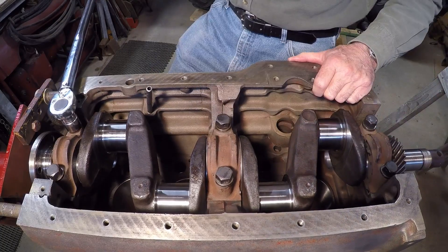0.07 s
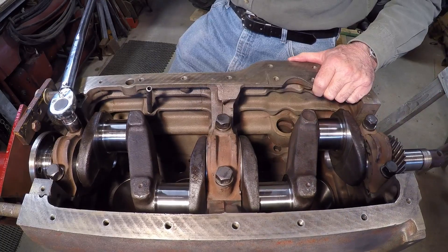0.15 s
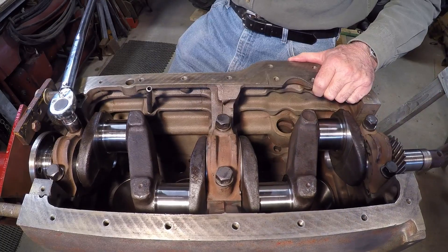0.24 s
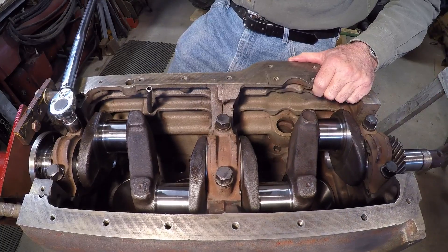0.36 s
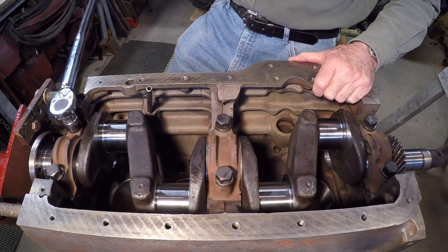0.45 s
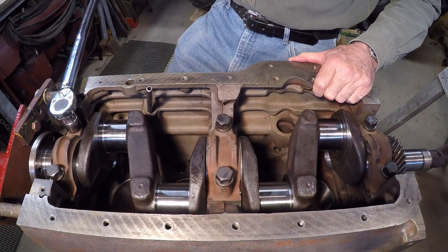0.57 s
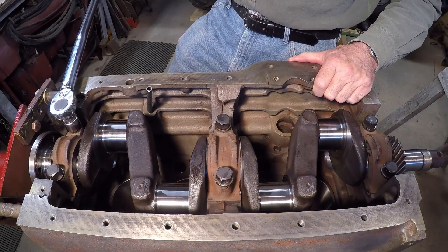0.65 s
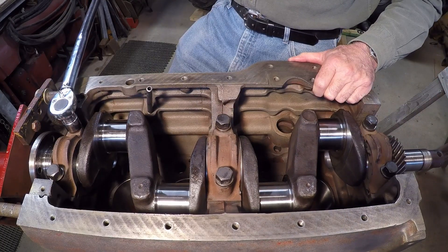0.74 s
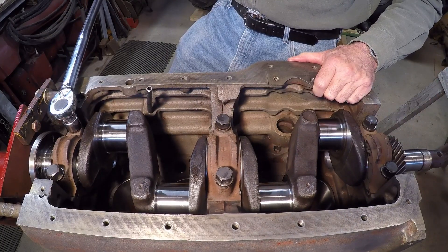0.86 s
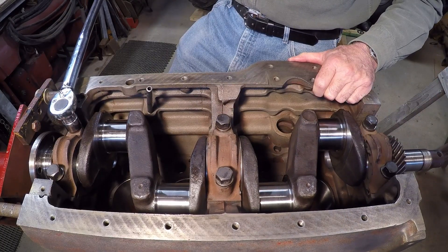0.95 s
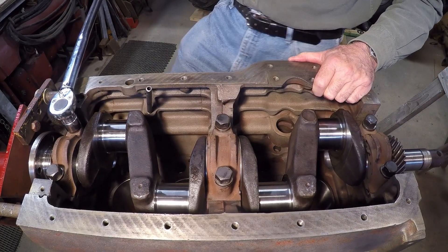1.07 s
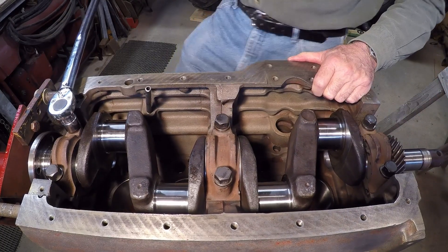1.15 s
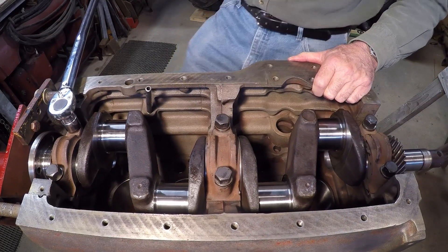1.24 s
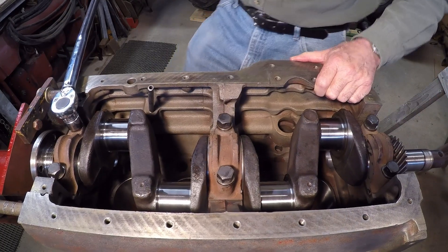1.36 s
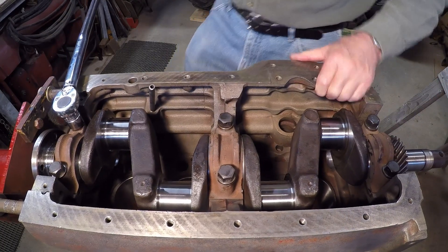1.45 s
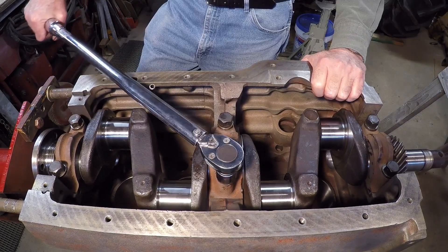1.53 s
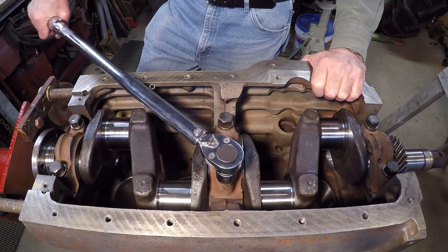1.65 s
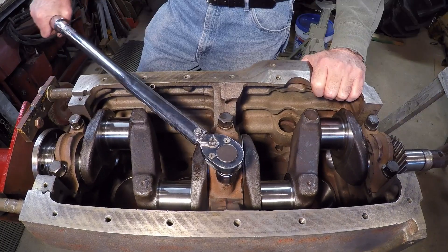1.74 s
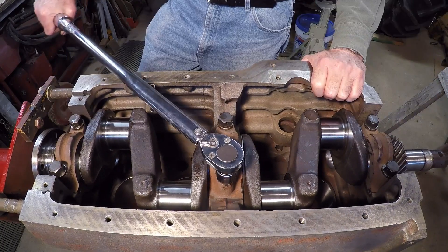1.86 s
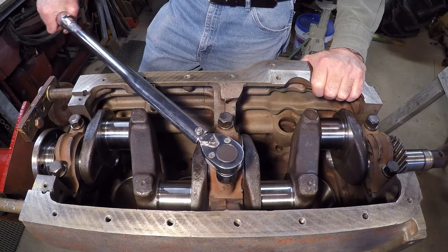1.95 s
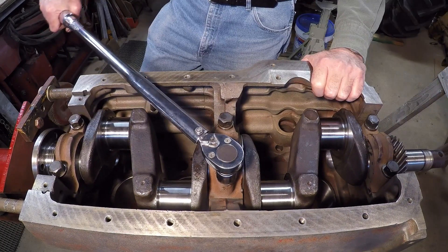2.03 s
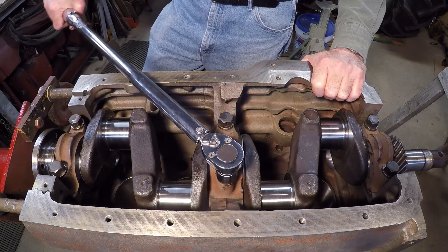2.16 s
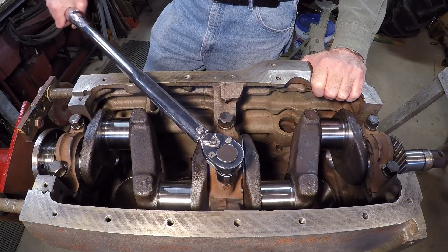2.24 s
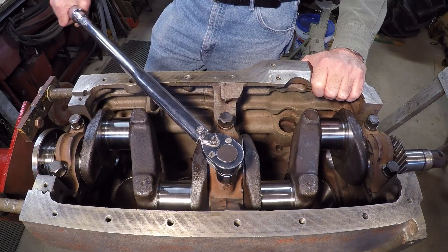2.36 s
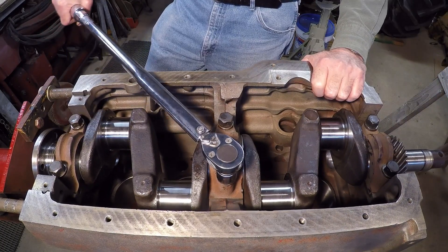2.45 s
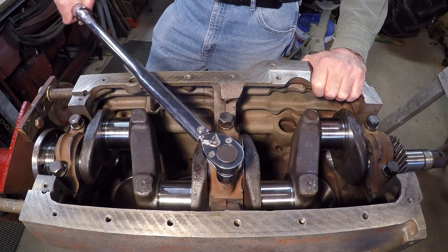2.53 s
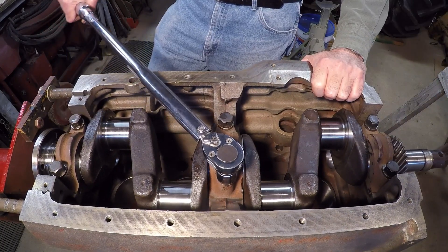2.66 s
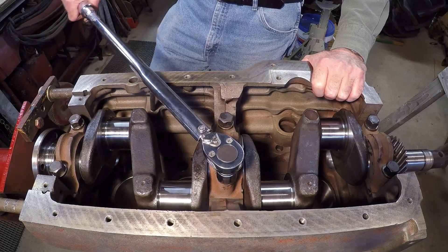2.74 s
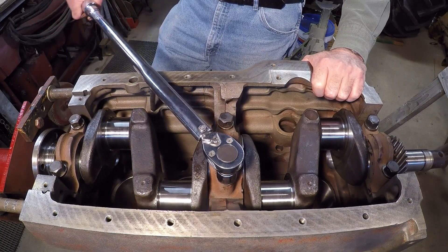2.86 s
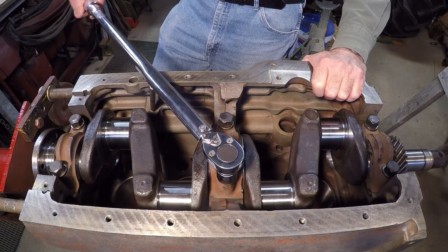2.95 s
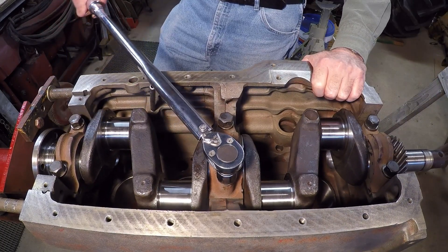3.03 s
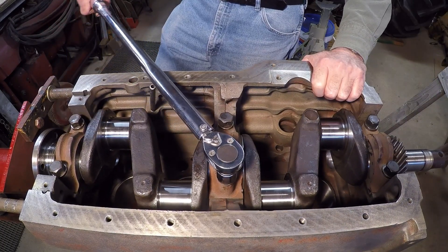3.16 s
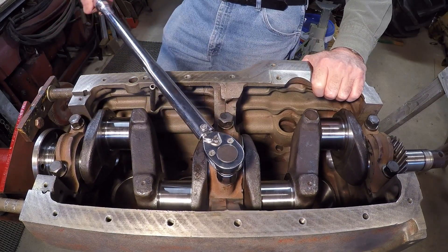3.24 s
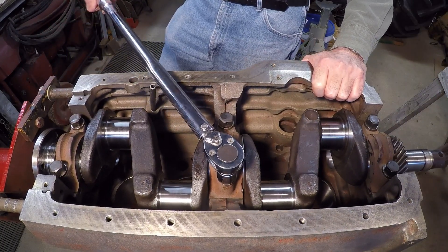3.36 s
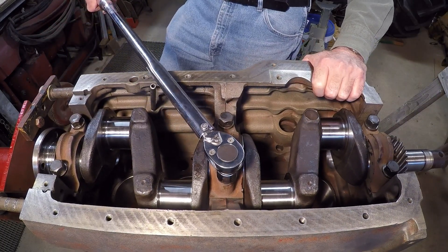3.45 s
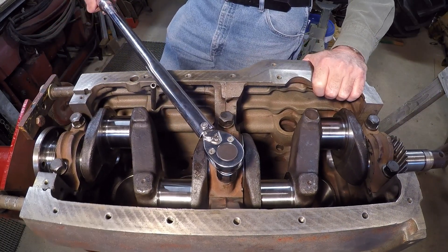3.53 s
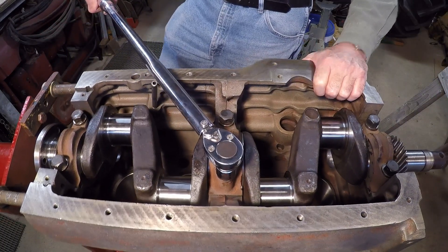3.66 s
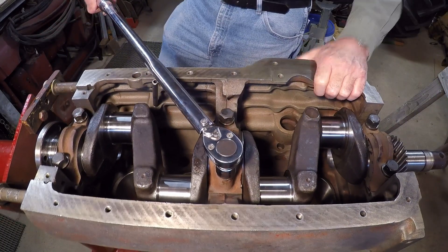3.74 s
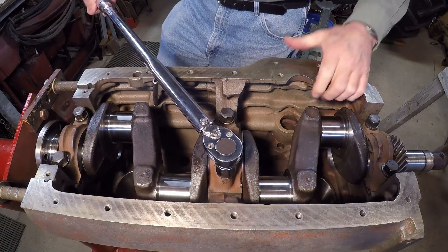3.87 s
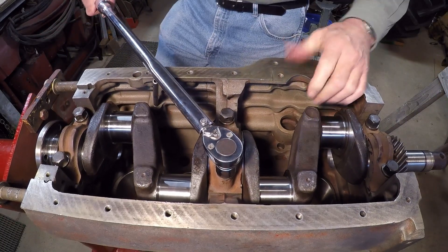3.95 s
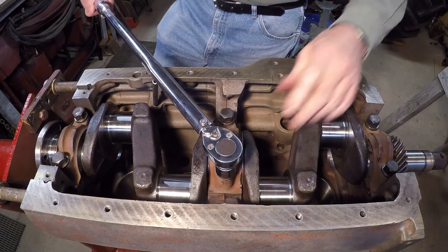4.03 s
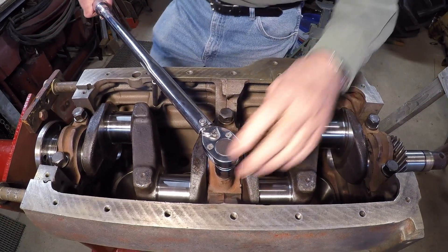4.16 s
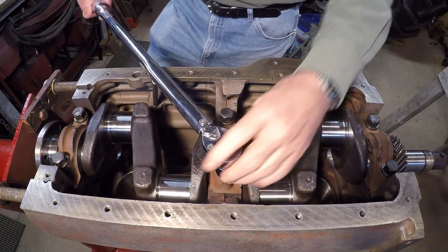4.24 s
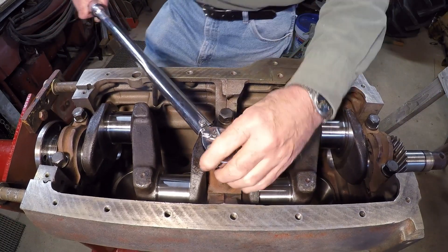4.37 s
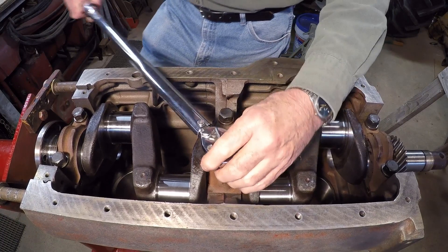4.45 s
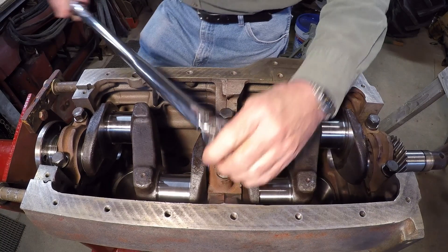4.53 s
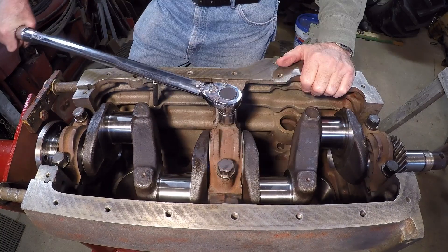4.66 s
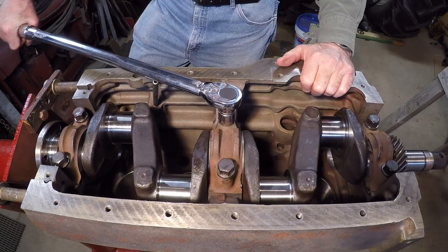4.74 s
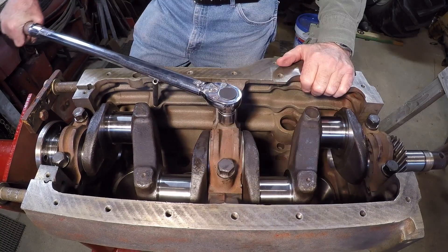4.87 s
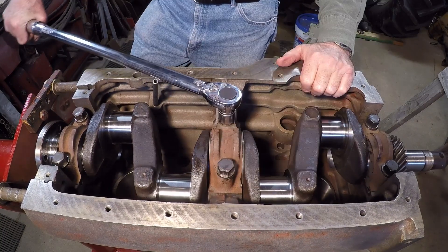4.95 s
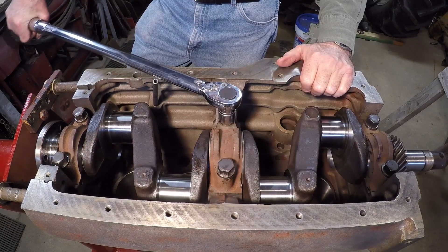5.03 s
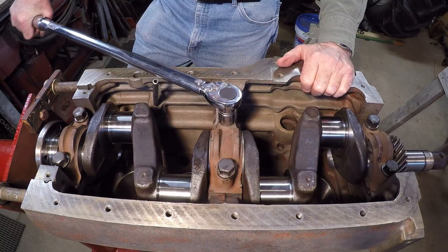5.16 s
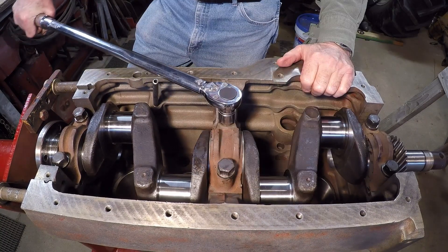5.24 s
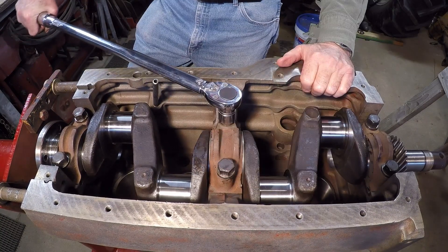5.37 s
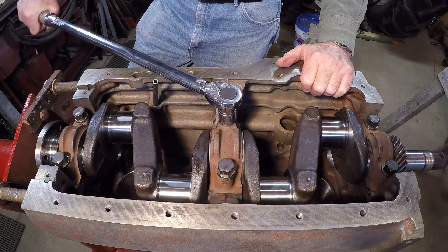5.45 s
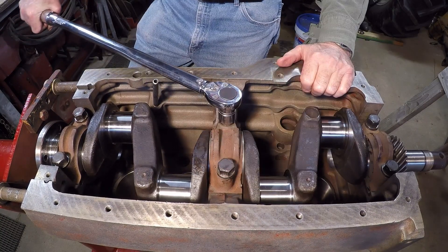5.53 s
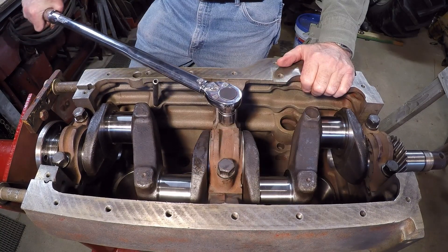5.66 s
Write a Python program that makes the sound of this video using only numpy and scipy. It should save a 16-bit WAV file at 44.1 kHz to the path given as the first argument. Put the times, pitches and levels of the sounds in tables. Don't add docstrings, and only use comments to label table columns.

```python
import sys
import numpy as np
from scipy import signal
from scipy.fft import rfft, irfft
from scipy.io import wavfile
from scipy.ndimage import uniform_filter1d

SR = 44100
rng = np.random.default_rng(int(sys.argv[2]) if len(sys.argv) > 2 else 0)


def attenuation_scalar(level_db):
    decades = np.asarray(level_db, float) / 20
    return 10 ** decades


def log_audio(samples):
    frames = np.atleast_2d(samples).T
    limited = np.clip(frames, -1, 1)
    pcm = np.round(limited * 32767).astype(np.int16)
    wavfile.write(sys.argv[1], SR, pcm)


N = 251370
T = np.arange(N) / SR

CUTS_S = [
    1.526,
    4.655,
]


def on_log(hz, table):
    table_hz, value = np.transpose(table)
    return np.interp(np.log(np.maximum(hz, 1)), np.log(table_hz), value)


def coloured(size, colour):
    hz = np.arange(size // 2 + 1) * SR / size
    spec = rfft(rng.standard_normal(size)) * attenuation_scalar(on_log(hz, colour))
    return spec / np.std(irfft(spec, size)), hz


def noise(colour):
    return irfft(coloured(N, colour)[0], N)


def add(out, sound, start_s):
    i = int(start_s * SR)
    out[i:i + len(sound)] += sound[:N - i]


def decay(t, t60):
    return np.exp(-np.log(1000) * t / t60)


def ring(t, modes):
    hz, db, t60 = np.transpose(modes)[:, :, None]
    return np.sum(attenuation_scalar(db) * np.sin(2 * np.pi * hz * t) * decay(t, t60), axis=0)


def paired(modes):
    return modes + [(hz * 1.0045, db - 5.5, t60) for hz, db, t60 in modes]


def walk(rate):
    hold = int(SR / rate)
    steps = np.repeat(rng.standard_normal(N // hold + 1), hold)
    return 1.2 * uniform_filter1d(steps, hold)[:N]


def burst(t, colour, t60):
    size = len(t)
    hz = np.arange(size // 2 + 1) * SR / size
    ceps = irfft(np.log(attenuation_scalar(on_log(hz, colour))), size)
    ceps[1:size // 2] *= 2
    ceps[size // 2 + 1:] = 0
    shape = np.exp(rfft(ceps))
    push = rng.standard_normal(size) * decay(t, t60)
    return irfft(rfft(push) * shape, size) / np.sqrt(np.mean(np.abs(shape) ** 2))


def strokes(rows):
    total = 0
    for peak_s, db, rise, fall in rows:
        below_peak = np.where(T < peak_s, rise * (peak_s - T), fall * (T - peak_s))
        total = total + attenuation_scalar(db - below_peak)
    return total


def shop():
    # Hz, dB per Hz.
    shop_colour = [(8.8, -32), (15, -6), (33, -0.5), (61, -5.5), (112, -11.5), (137, -18.5), (163, -19.5),
                   (380, -26.5), (494, -26.5), (721, -30), (4260, -37), (14500, -46), (15800, -56)]
    # centre in seconds, lift in dB, half length in seconds.
    stir = [
        (0.01, 3, 0.14),
        (4.102, 5, 0.33),
        (5.652, 0, 0.21),
    ]
    spec, hz = coloured(N, shop_colour)
    middle = np.exp(-np.log2(np.maximum(hz, 1) / 1200) ** 2 / 7.0)
    lift_db = sum(db * np.exp(-((T - s) / half_s) ** 2) for s, db, half_s in stir)
    swell = attenuation_scalar(lift_db + 0.4 * walk(5.6))
    swell = swell * attenuation_scalar(lift_db * 0.18 * walk(19))
    return attenuation_scalar(-53.5) * (irfft(spec * (1 - middle), N) + irfft(spec * middle, N) * swell)


def hands():
    # centre in seconds, level in dB, half length in seconds, centre in Hz.
    rustles = [(3.968, -82, .04, 900), (4.037, -69, .05, 640), (4.1, -71.5, .12, 1800),
               (4.25, -73, .1, 4000), (4.3, -75, .04, 1500), (4.212, -76, .05, 1700),
               (4.29, -72, 0.046, 500), (4.803, -68, 0.028, 1150), (4.85, -75, .02, 1100),
               (5.01, -69, .015, 1500), (.15, -63, 0.056, 300), (1.467, -63, 0.01, 800),
               (4.556, -57.5, 0.0053, 980), (4.513, -60, 0.0054, 900)]
    out = 0
    for s, db, half_s, hz in rustles:
        cloth = signal.lfilter(*signal.iirpeak(hz, 3.0, SR), rng.standard_normal(N))
        grain = attenuation_scalar(db + 2.8 * walk(70))
        out = out + cloth / np.std(cloth) * grain * np.exp(-((T - s) / half_s) ** 2)
    return out


def ticks():
    # start in seconds, level in dB, t60 in seconds, treble tilt in dB per kHz.
    contacts = [
        (1.4974, -35.5, 0.013, 0.4),
        (4.4160, -40, 0.018, -1.5),
        (4.4215, -36, 0.022, -1),
        (4.431, -32, 0.019, -4),
        (3.2372, -27, .03, 1.0),
        (.8105, -47, .1, 0),
        (3.7104, -40, 0.034, 1.62),
        (1.1562, -43, .03, 0.8),
        (4.537, -51.5, 0.059, -6),
        (4.512, -60, 0.027, -4.5),
    ]
    # Hz, dB per Hz.
    tick_colour = [(880, -55.5), (1500, -21), (2640, -22.5), (3300, -12), (3900, 0), (4500, -6), (5300, 1),
                   (5830, -4), (6560, -16), (7670, -9.5), (11600, -19.5), (13100, -21.5), (15500, -27)]
    out = np.zeros(N)
    for s, db, t60, tilt in contacts:
        colour = [(hz, level + tilt * hz / 1000) for hz, level in tick_colour]
        add(out, attenuation_scalar(db) * burst(T[:4096], colour, t60), s)
    return out


def wash(t, colour, modes, stretch, share):
    # Hz, t60 in seconds.
    wash_t60 = [(150, 0.67), (500, 0.49), (1000, .35), (2500, 0.37), (4500, 0.37), (7000, 0.35),
                (9500, 0.28), (12000, 0.29), (15000, 0.22)]
    # edge in Hz, dB there, reach below in Hz.
    tube = [(4600, 2.5, 900), (7300, 5.2, 950), (9780, 3, 740), (11400, 3, 950), (13900, 5.5, 900)]
    edge_softness_hz, echo_width_hz, scatter_hz = 90, 12, 14
    spec, hz = coloured(len(t), colour)
    tube_db = 0
    for edge, db, reach in tube:
        side = np.tanh((edge - hz) / edge_softness_hz)
        tube_db = tube_db + db * side * np.exp(-np.abs(edge - hz) / reach)
    peaks = [min(2500 / f, 1) / (1 + ((hz - f) / echo_width_hz) ** 2) for f, _, _ in modes]
    echo_db = 5 * np.max(peaks, axis=0)
    span = max(int(scatter_hz / hz[1]), 1)
    scatter = np.sqrt(span) * uniform_filter1d(rng.standard_normal(len(hz)), span)
    spec = spec * attenuation_scalar(share * tube_db + echo_db + 2.5 * scatter)
    octave, out = np.log2(np.maximum(hz, 1)), 0
    for centre in np.arange(7, 14.6, 0.5):
        band = irfft(spec * np.clip(1 - 2 * np.abs(octave - centre), 0, 1), len(t))
        out = out + band * decay(t, stretch * on_log(2 ** centre, wash_t60))
    return out


def wrench():
    # start in seconds, ringing level in dB, crack over ringing in dB, crack t60 in seconds,
    # share of the blow through the wrench tube (about 0 to 1).
    clicks = [
        (.8150, -15.5, 11, 0.06, 1.14),
        (1.1575, -19, 12, 0.067, 0.2),
        (3.2384, -15, 10.5, 0.057, 1),
        (3.7118, -21.5, 6.5, 0.047, 0.2),
        (4.4080, -37, 7, 0.085, 0.65),
    ]
    # Hz, dB per Hz.
    end_break_crack = [(120, -48.5), (200, -24), (350, -36.5), (480, -15), (780, -7.5), (1090, -2.5),
                       (1400, -11.5), (2020, -16), (3680, -0.5), (4750, -11), (6130, -2.5), (6960, -7),
                       (7480, -13.5), (8980, -4.5), (9660, -12.5), (10800, -16), (15500, -32.5)]
    end_reset_crack = [(120, -51), (200, -28.5), (400, -32), (680, -12.5), (1030, 1.5), (1200, 1),
                       (1370, -22.5), (1550, -6.5), (2330, -11), (3550, 3), (4100, -9), (6130, -8.5),
                       (6960, -20.5), (7760, -12.5), (8980, -21), (10400, -42), (11600, -34), (15500, -56)]
    centre_break_crack = [(120, -43.5), (200, -18), (462, -23), (874, -17.5), (1230, -19.5), (1600, -19),
                          (1950, -7), (4030, -2.5), (5390, -5), (6960, 1.5), (7620, -9.5), (9480, -2),
                          (10200, -12.5), (12900, -13.5), (15500, -31.5)]
    centre_reset_crack = [(120, -40), (200, -19.5), (471, -39.5), (957, -8.5), (1840, -10.5), (3750, -6),
                          (5300, -13), (6350, -4), (7900, -30), (8980, -17), (10600, -32), (12900, -36),
                          (15500, -57)]
    knock_crack = [(150, -33), (250, -1.5), (563, -18), (897, -1.5), (1430, 0), (1820, -13), (2280, -1),
                   (3890, -2), (5220, -7.5), (10100, -27), (12000, -23), (14000, -34), (15500, -84.5)]
    cracks = [end_break_crack, end_reset_crack, centre_break_crack, centre_reset_crack, knock_crack]
    # Hz, dB per Hz.
    end_break_wash = [(240, -46.5), (400, -20.5), (568, -12), (700, -7), (830, -9), (913, -3), (1380, -8.5),
                      (1930, -0.5), (2110, -9.5), (2540, -2.5), (3140, -7.5), (3950, -1), (4750, -10),
                      (6750, -5.5), (7100, -5), (7510, -13), (8300, -9), (9160, -7), (10000, -13.5),
                      (12600, -20), (15400, -36)]
    end_reset_wash = [(130, -52.5), (220, -23.5), (425, -22.5), (526, -10.5), (628, -17.5), (674, -8),
                      (777, -15), (1000, -2), (1150, -4), (1370, -15), (1610, -4), (2050, -4.5), (2750, -7),
                      (3520, -2), (4060, -9.5), (6000, -14), (7500, -22.5), (12600, -35), (14300, -51.5),
                      (15400, -57.5)]
    centre_break_wash = [(290, -47.5), (500, -17), (620, -15.5), (780, -16), (967, -2.5), (1360, -12.5),
                         (1470, -5.5), (1750, -8.5), (1960, -4), (2100, -9), (2530, -1.5), (3130, -8),
                         (3600, -4.5), (4180, -3.5), (4480, -3.5), (4750, -13.5), (5890, -8.5),
                         (7520, -13.5), (9060, -7), (9900, -16.5), (10800, -14), (12600, -19), (14000, -26),
                         (15400, -31)]
    centre_reset_wash = [(130, -54), (220, -12), (232, -19), (628, -14.5), (674, -14), (750, -16),
                         (928, -5), (1110, -5), (1370, -6), (1470, -10), (2100, -5.5), (3460, -1.5),
                         (5300, -16), (5790, -15.5), (12000, -34.5), (13500, -45), (15400, -64)]
    knock_wash = [(240, -50.5), (400, -30), (527, -6), (683, -24.5), (760, -8), (833, -14), (1200, 0),
                  (1530, -13), (1730, -6.5), (3660, -6), (15400, -43.5)]
    washes = [end_break_wash, end_reset_wash, centre_break_wash, centre_reset_wash, knock_wash]
    # Hz, dB, t60 in seconds.
    end_break_rings = [(915, -1.5, 0.11), (1071, -4, 0.08), (1505.6, -14.5, 0.25), (1660, -14, 0.28),
                       (2008, -18.5, 0.56), (2089, -19.5, 0.21), (2281, -12, 0.1), (2520, -13.5, 0.31),
                       (2616, -14, 0.28), (2810, -16.5, 0.22), (2990, -20.5, 0.59), (3500, -20, 1.0),
                       (3760, -8.5, 0.13), (4450, -5, 0.13), (4570, -17.5, 0.16), (5960, -10, 0.12),
                       (6430, 0, 0.043), (6800, -14, 0.14), (6950, -5, 0.098), (8000, -16, 0.14),
                       (8730, -5, 0.11), (9281, -21, 0.2), (1238, -15.5, .2), (826, -14, 0.12),
                       (772, -4, .1), (660, -8, 0.1), (7120, -22, .3), (1870, -14, 0.17)]
    end_reset_rings = [(927, -6, 0.16), (1086, -2.5, 0.12), (1219, -6.5, 0.14), (1536, -15, 0.15),
                       (1674, -16.5, 0.19), (1770, -9.5, 0.18), (1960, -8, 0.2), (2420, -5, 0.092),
                       (2640, -21, 0.3), (3100, -8.5, 0.13), (3530, -11, 0.33), (3670, -7, 0.14),
                       (3700, -9.5, 0.15), (4080, -1, 0.058), (4631, -7, 0.1647), (4850, -15, 0.15),
                       (5025, -31, 0.68), (5594, -21.5, 0.28), (5760, -22.5, 0.35), (7208, -27, 0.24),
                       (8215, -27.5, 0.2), (8710, -16, 0.073), (652, -9.5, .15), (1690, -16, 0.21),
                       (2186, -18, 0.19)]
    centre_break_rings = [(930.5, -7.5, 0.12), (1191, -17.5, 0.64), (1499, -12, 0.087), (2007, -10, 0.2094),
                          (2599, -5.5, 0.24), (2850, -15.5, 0.33), (3190, -11, 0.12), (3200, -6, 0.055),
                          (3862, -7, 0.21), (3970, -4.5, 0.077), (4200, -0.5, 0.092), (4538, -15, 0.3),
                          (5460, -15, 0.15), (5690, -24, 0.15), (5960, -17.5, 0.23), (6320, -11, 0.17),
                          (6550, -14.5, 0.16), (7300, -10.5, 0.15), (8100, -29.5, 5.0), (8703, -7.5, 0.1),
                          (9000, -12.5, 0.12), (9300, -11.5, 0.14), (1240, -10, .12), (1099.7, -23, .36),
                          (2480, -13, 0.19)]
    centre_reset_rings = [(692, -10.5, 0.075), (928, -5, 0.12), (1137, -6.5, 0.17), (1494, -11.5, 0.28),
                          (1590, -23, 0.36), (1992, -15.5, 0.39), (2290, -10, 0.15), (2473, -13, 0.33),
                          (2600, 1, 0.13), (2998, -24, 0.33), (3162, -0.5, 0.089), (3340, -3, 0.18),
                          (3644, -21.5, 0.61), (4510, -2.5, 0.2), (5150, -27, 0.43), (5437, -27, 0.32),
                          (5730, -25, 0.35), (6450, -26, 0.24), (6660, -24, 0.13), (7300, -14, 0.12),
                          (8872, -27, 0.15), (9157, -25, 0.17), (1686, -28, 0.44), (1790, -20, 0.38),
                          (1860, -28, 0.26), (2480, -18, 0.24)]
    knock_rings = [(777, -9.5, 0.46), (973, -12.5, 0.7), (1253, -10, 0.28), (1497, -4, 0.43),
                   (2020, -11.5, 0.63), (2230, -5, 0.15), (2600, -13, 0.25), (3570, -11.5, 1.4),
                   (3763, -3, 0.21), (4460, -8, 0.11), (4520, -2.5, 0.2), (5430, -11, 0.1),
                   (6880, -7, 0.095), (11560, -21, 0.077)]
    rings = [end_break_rings, end_reset_rings, centre_break_rings, centre_reset_rings, knock_rings]
    # Hz, dB, t60 in seconds.
    pawl_rings = [
        [(4060, -9.5, 0.013), (6840, -15.5, 0.023)],
        [(3130, -15, 0.035), (3762, -18, 0.037)],
        [(7070, -11, 0.017), (4090, -11, 0.037)],
        [(6250, -18, 0.013), (3800, -16, 0.034)],
        [(2450, -46, .03), (3570, -34, .03)],
    ]
    handle_hz = [3831, 992, 163, 186, 286, 760, 920, 1071, 2616, 1498]
    # dB from the end cap, dB from the centre cap, t60 in seconds.
    handle_levels = [(-39, -49, 1.4), (-25, -20.5, 0.45), (-29, -32, 0.53), (-30.5, -29.5, 0.67),
                     (-22.5, -16.5, .15), (-25.5, -34, 0.19), (-17, -8.5, 0.16), (-10, -28.5, 0.18),
                     (-22, -17.5, 0.37), (-30, -13.5, 0.33)]
    iron_t60 = 0.3
    out, t = np.zeros(N), T[:2 ** 15]
    for k, (s, level_db, crack_db, crack_t60, share) in enumerate(clicks):
        slack = s > 4
        loose = 1.14 if slack else 1
        crack = attenuation_scalar(crack_db) * burst(t, cracks[k], crack_t60)
        dense = wash(t, washes[k], rings[k], 0.89 * loose, share)
        dense = dense * (1 - np.exp(-t / 0.0054))
        iron = [(hz, db - 3.5, min(t60, iron_t60 * loose ** 2)) for hz, db, t60 in rings[k]]
        handle = []
        for hz, (end_db, centre_db, t60) in zip(handle_hz, handle_levels):
            handle.append((hz, end_db if s < CUTS_S[0] else centre_db, t60))
        blow = crack + attenuation_scalar(-2.5) * dense + ring(t, paired(iron)) + ring(t, handle) * attenuation_scalar(-7.5 * slack)
        click = attenuation_scalar(level_db) * blow + ring(t, pawl_rings[k])
        rise_ms = np.interp(share, [0, 1], [1.4, 0.79])
        left_s = min(cut - s for cut in CUTS_S + [N / SR] if cut > s)
        add(out, click * (1 - np.exp(-1000 * t / rise_ms)) * (t < left_s), s)
    return out


def rebounds():
    # start in seconds, Hz, level in dB, t60 in seconds.
    bounces = [(0.815, 4092, -12, 0.03), (.8179, 6097, -5, 0.013), (.8180, 3900, -6, .015),
               (.8325, 8590, -20, .015), (1.159, 3000, -14, 0.011), (1.1612, 3603, -13, 0.013),
               (1.1645, 1099, -16.5, .02), (1.1736, 1185, -20, .02), (3.2388, 6513, -2, .012),
               (3.2445, 9000, -16.5, .015), (3.2407, 4124, -8, 0.013), (3.2414, 6910, -6.5, 0.0099),
               (3.2458, 4114, -13, .025), (3.2865, 8690, -21, .025), (3.2955, 4150, -19, .015),
               (3.7119, 6370, -14, 0.0075), (3.7146, 3810, -18.5, 0.01), (3.7187, 3010, -20, .012),
               (3.7257, 3200, -18, 0.013)]
    out, t = np.zeros(N), T[:2048]
    for s, hz, db, t60 in bounces:
        add(out, ring(t, [(hz, db, t60)]) * (1 - np.exp(-t / 0.00023)), s)
    return out


def scuff():
    # peak in seconds, level in dB, rise in dB per second, fall in dB per second.
    grating = [
        (1.47, -52.5, 697, 204),
        (1.514, -59.5, 700, 500.5),
    ]
    # Hz, dB per Hz.
    scuff_colour = [(120, -4.5), (200, 1), (1110, -15.5), (2290, -17), (2750, -13.5), (4840, -10),
                    (5300, -21), (14400, -26), (15500, -39)]
    return noise(scuff_colour) * strokes(grating) * attenuation_scalar(1.2 * walk(190)) * (T < CUTS_S[0])


def block():
    # start in seconds, peak level in dB, Hz.
    rocks = [
        (3.356, -34, 368),
        (3.393, -41, 360),
        (3.418, -46, 364),
        (3.445, -48, 370),
        (3.473, -55, 365),
        (3.899, -53.5, 179),
    ]
    out, t = np.zeros(N), T[:4096]
    for s, db, hz in rocks:
        knock = ring(t, [(hz, db + 0.1, 15 / hz)])
        add(out, knock * (1 - np.exp(-t / 0.00064)), s)
    return out


def slide():
    # peak in seconds, level in dB, rise in dB per second, fall in dB per second.
    scraping = [
        (4.525, -45.5, 350, 157),
        (4.545, -45, 400, 232),
    ]
    # Hz, dB per Hz.
    slide_colour = [(290, -51), (500, -18), (967, -3.5), (1800, -12), (2070, -4.5), (2690, -5.5),
                    (3200, -6), (4450, -5), (5000, -8), (5600, -22), (7760, -40), (9300, -27), (11000, -30),
                    (14300, -61), (22000, -120)]
    # Hz, dB, t60 in seconds.
    block_modes = [(990, 14, 0.53), (1500, 12, 0.33), (2660, 5, .06)]
    # peak in seconds, level in dB, rise in dB per second, fall in dB per second.
    singing = [
        (4.515, -75, 503, 300),
        (4.548, -61, 1200, 660),
        (4.588, -74, 900, 900),
        (4.612, -79, 600, 900),
        (4.502, -80, 600, 900),
    ]
    scrape = noise(slide_colour) * strokes(scraping) * attenuation_scalar(1.1 * walk(260) - 10.5)
    for hz, db, t60 in block_modes:
        scrape = scrape + attenuation_scalar(db) * signal.lfilter(*signal.iirpeak(hz, hz * t60 / 2.4, SR), scrape)
    fastest_s = singing[1][0]
    note_hz = 12730 + 220 * np.exp(-((T - fastest_s) / 0.02) ** 2)
    wall_width_hz = 260
    wall = walk(wall_width_hz * 2) * np.sin(2 * np.pi * np.cumsum(note_hz) / SR)
    return (scrape + wall / np.std(wall) * strokes(singing)) * (T < CUTS_S[1])


def scene():
    # Hz, dB per Hz.
    side_hiss = [(12, -29.5), (20, -1), (549, -3), (1630, -6), (2090, -8.5), (5230, -4), (7520, -11.5),
                 (12400, -12), (15500, -22.5)]
    mid = shop() + hands() + ticks() + wrench() + rebounds() + scuff() + block() + slide()
    hiss = attenuation_scalar(-93.0) * noise(side_hiss)
    side = attenuation_scalar(7.0 * walk(22)) * (hiss + attenuation_scalar(-48) * np.roll(mid, 60))
    return np.array([mid + side, mid - side])


def band_limit(x):
    return signal.sosfilt(signal.butter(12, 16540, fs=SR, output="sos"), x)


def record(dry):
    # start in seconds, end in seconds, lowest lost Hz.
    blanks = [
        (.8072, .8100, 900),
        (1.1482, 1.1544, 2200),
        (3.2325, 3.2366, 1200),
    ]
    rounded = np.tanh(1.12 * dry) / 1.12
    for start, end, hz in blanks:
        high_pass = signal.butter(4, hz, "high", fs=SR, output="sos")
        treble = signal.sosfiltfilt(high_pass, rounded)
        gate = 1.0 * (T > start) * (T < end)
        rounded = rounded - treble * uniform_filter1d(gate, size=24)
    top_cut = signal.ellip(12, 0.3, 60, 15230, fs=SR, output="sos")
    finished = signal.sosfilt(top_cut, rounded) + attenuation_scalar(-24) * rounded
    return band_limit(finished)


dry = scene()
out = record(dry)
log_audio(out)
```